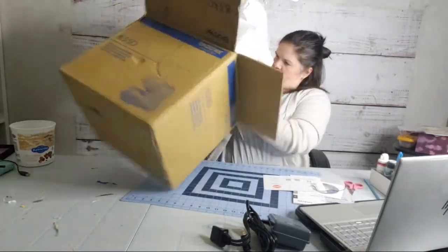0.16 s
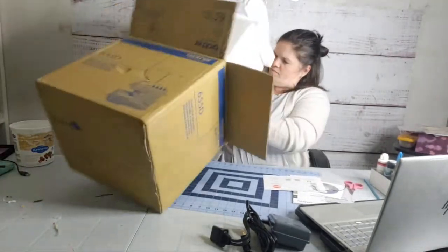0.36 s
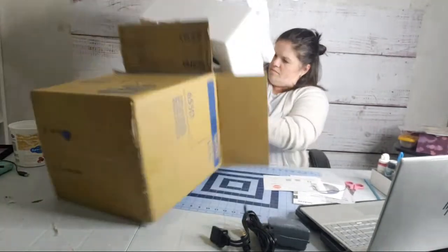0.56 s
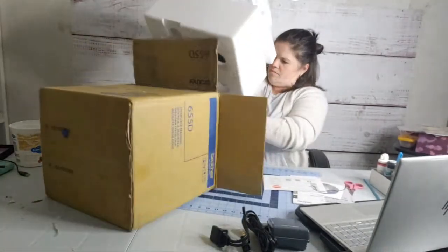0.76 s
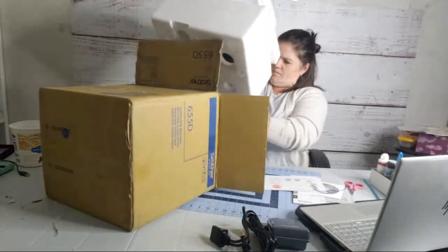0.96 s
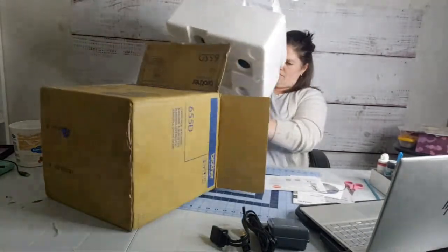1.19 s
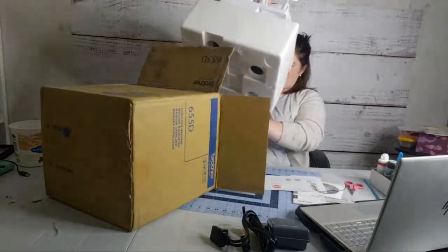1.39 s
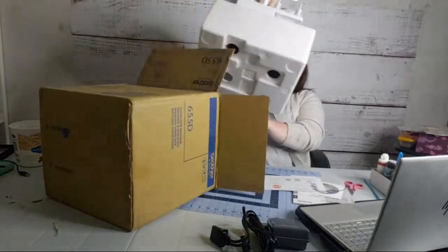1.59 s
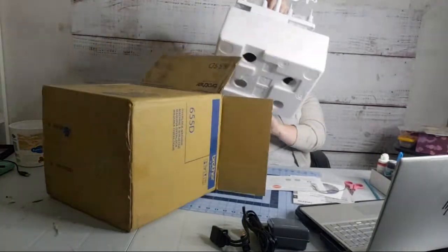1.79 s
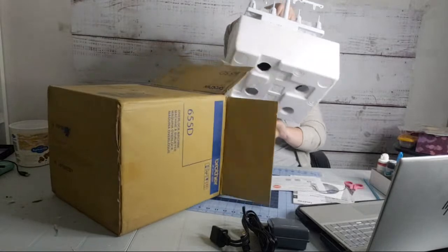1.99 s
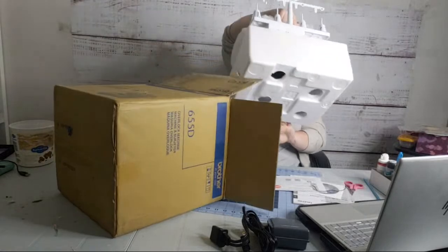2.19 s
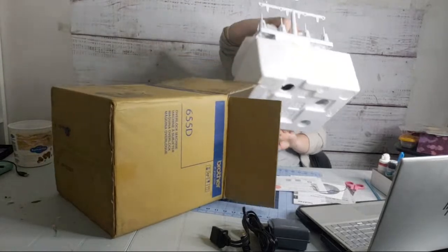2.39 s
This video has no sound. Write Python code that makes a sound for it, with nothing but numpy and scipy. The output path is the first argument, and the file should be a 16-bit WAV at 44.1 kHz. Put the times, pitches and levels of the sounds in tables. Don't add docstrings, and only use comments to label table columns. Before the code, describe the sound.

A cardboard box slaps onto a table amid dry scraping, foam squeaks and small hollow creaks

```python
import sys
import numpy as np
from scipy import signal
from scipy.fft import rfft, irfft
from scipy.io import wavfile
from scipy.ndimage import uniform_filter1d

SR = 44100
rng = np.random.default_rng(int(sys.argv[2]) if len(sys.argv) > 2 else 0)


def linear_from_db(decibels):
    return 10 ** (np.asarray(decibels, float) / 20)


def master(y):
    cut = np.clip(np.atleast_2d(y).T, -1, 1)
    pcm = np.round(cut * 32767)
    wavfile.write(sys.argv[1], SR, pcm.astype(np.int16))


N = 108045
BURST = 8192

# frequency in Hz, level in dB, 60 dB decay time in seconds.
BOX_MODES = [(71.3, 2, 0.11), (99, -4, 0.14), (120, -3.5, 0.11), (144.6, -2, 0.48), (218, -4.5, 0.062),
             (284.8, 5, 0.18), (353, 1, 0.11), (376.3, -14, 0.099), (465, -4, 0.31), (562.3, 8, 0.22),
             (653, -29, 0.25), (846, 5, 0.14), (1113, -23, 0.36), (1270, -30.5, 0.1)]


def unit(x):
    return x / np.sqrt(np.mean(x ** 2))


def add(out, s, sound):
    part = out[max(int(s * SR), 0):][:len(sound)]
    part += sound[:len(part)]


def colour(x, points):
    p = np.array(points, float)
    hz = np.arange(N // 2 + 1) * SR / N + 1
    gain_db = np.interp(np.log(hz), np.log(p[:, 0]), p[:, 1])
    return unit(irfft(rfft(x) * linear_from_db(gain_db), N))


def walk(rate):
    k = int(SR / rate)
    held = rng.standard_normal(size=256)[np.arange(N) // k]
    return unit(uniform_filter1d(uniform_filter1d(held, k), k))


def ring(x, hz, t60):
    r = np.exp(-np.log(1000) / (t60 * SR))
    return signal.lfilter([1 - r, 0, r - 1], [1, -2 * r * np.cos(2 * np.pi * hz / SR), r * r], x)


def bumps(contacts, modes):
    swell = 0.35
    relative_width = 0.67
    dry_db, body_db = 3.5, 2.5
    push, t = np.zeros(N), np.arange(BURST) / SR
    for s, db, hz, contact in contacts:
        shape = (1 - np.exp(-t / (swell * contact))) * np.exp(-(t / contact) ** 2)
        t60 = np.log(1000) / (np.pi * hz * relative_width)
        rough = rng.standard_normal(BURST) * shape
        burst = ring(ring(rough, hz, t60), hz, t60 / 2)
        same_energy = np.sqrt(np.sum(shape ** 2) / np.sum(burst ** 2))
        add(push, s, burst * linear_from_db(db) * same_energy)
    body = np.zeros(N)
    for k, (hz, db, t60) in enumerate(modes):
        body += (-1) ** k * linear_from_db(db) * ring(push, hz, t60)
    return linear_from_db(dry_db) * push + linear_from_db(body_db) * body


def box_bumps():
    # start in seconds, level in dB, centre in Hz, contact time in seconds.
    bump_contacts = [(.001, -34.5, 260, 0.028), (.05, -41.5, 140, 0.075), (.165, -44.5, 150, 0.04),
                     (.245, -41.5, 197, 0.035), (.35, -47.5, 215, 0.077), (.424, -36, 325, 0.032),
                     (.436, -25.5, 107, 0.02), (.466, -28.5, 120, 0.026), (.515, -38.5, 197, 0.058),
                     (.555, -36, 97, 0.056), (.598, -21.5, 726, 0.0081), (.6025, -16, 343, 0.016),
                     (.606, -17, 115, 0.018), (.627, -18.5, 398, 0.024), (.635, -22, 141, 0.022),
                     (.655, -33, 66.7, 0.063), (.692, -26, 554, 0.031), (.698, -30, 139, .045),
                     (.733, -33.5, 330, 0.037), (.782, -30, 290, 0.016), (.78, -33, 83.4, 0.029),
                     (.875, -52, 141, 0.019), (.955, -50.5, 94, 0.018), (1.325, -53.5, 110, 0.025),
                     (1.641, -44, 120, 0.033), (1.685, -52, 144, 0.026), (1.705, -49, 91, 0.041),
                     (1.785, -46.5, 407, 0.026), (1.81, -52, 93, 0.053), (2.412, -50, 182, 0.016)]
    return bumps(bump_contacts, BOX_MODES)


def more_box_knocks():
    # start in seconds, level in dB, centre in Hz, contact time in seconds.
    more_contacts = [(.001, -41.5, 87, 0.02), (.075, -49.5, 70, 0.027), (.235, -46, 67, .04),
                     (.27, -49.5, 104, 0.043), (.375, -50, 60, .03), (.44, -42, 60, 0.044),
                     (.54, -39, 60, 0.026), (.597, -24.5, 840, 0.0051), (.69, -39, 1340, 0.024),
                     (.695, -47, 2240, .03), (.735, -38, 1390, 0.015), (.79, -44, 710, 0.024),
                     (.875, -49.5, 70, 0.035), (.965, -55, 67, .02), (1.125, -58.5, 80.5, 0.036),
                     (1.24, -68, 200, 0.036), (1.3, -53, 161, 0.045), (1.343, -46.5, 228, 0.0051),
                     (1.642, -46, 65, 0.02), (1.65, -55.5, 258, 0.031), (.608, -36.5, 1820, 0.033),
                     (1.68, -50, 65, .05), (1.87, -60, 70, 0.039), (2.07, -46, 1500, 0.011),
                     (2.19, -48.5, 1510, 0.049), (2.27, -44, 627, .02), (2.265, -54, 880, .02),
                     (2.3, -47, 750, 0.02), (2.345, -57, 308, 0.017), (2.42, -58, 110, .03),
                     (.65, -31, 77, 0.055), (.601, -29, 4550, 0.017)]
    return bumps(more_contacts, BOX_MODES)


def strokes(moves):
    t = np.arange(N) / SR
    power = np.zeros(N)
    for s, db, rise, fall in moves:
        distance = np.where(t < s, (s - t) / rise, (t - s) / fall)
        power += linear_from_db(db - 20 * distance ** 2) ** 2
    return np.sqrt(power)


def rubbing(moves, points):
    grain_db, flicker_db, drag_db = 2.5, 1.2, 0.5
    grain_size = np.minimum(rng.exponential(size=N), 5)
    grains = rng.standard_normal(N) * linear_from_db(grain_db * grain_size)
    body = colour(grains, points)
    low = signal.sosfilt(signal.butter(2, 5000, fs=SR, output="sos"), body)
    high = body - low
    mixed = low * linear_from_db(flicker_db * walk(29.38)) + high * linear_from_db(flicker_db * walk(30.17))
    return unit(mixed * linear_from_db(drag_db * walk(12.3))) * strokes(moves)


def card_slides():
    # peak in seconds, level in dB, rise in seconds, fall in seconds (both over 20 dB).
    card_moves = [(.038, -43, 0.47, 0.12), (.212, -38.5, 0.17, 0.34), (.414, -37.5, 0.021, 0.15),
                  (.542, -42.5, .14, 0.1), (.607, -28.5, 0.021, 0.079), (.706, -38, 0.14, 0.045),
                  (.797, -45, 0.12, 0.064), (.902, -53, 0.12, 0.15), (1.302, -50.5, 0.51, 0.35),
                  (1.518, -46, 0.41, 0.15), (1.595, -53, 0.061, 0.035), (1.67, -62, 0.066, 0.034),
                  (1.772, -44.5, 0.0095, 0.16), (1.835, -46.5, 0.096, 0.049), (2.062, -48, 0.3, 0.31),
                  (2.202, -50, 0.032, 0.12), (2.328, -54, 0.13, 0.09), (2.427, -53, 0.015, .14)]
    # frequency in Hz, density in dB per Hz.
    card_tone = [(55, -24), (250, -2.5), (700, 3), (1800, 1), (3000, -1), (5000, -3), (7000, -9),
                 (11000, -12.5)]
    return rubbing(card_moves, card_tone)


def foam_strokes():
    # peak in seconds, level in dB, rise in seconds, fall in seconds (both over 20 dB).
    foam_moves = [(.049, -38, 0.1, 0.065), (.221, -33, 0.15, 0.32), (.408, -30, 0.094, 0.15),
                  (.548, -34, 0.1, 0.067), (.6025, -32.5, .005, 0.083), (.712, -38.5, 0.11, 0.19),
                  (.795, -41, 0.11, 0.026), (.893, -47, 0.023, 0.13), (1.268, -42.5, 0.26, 0.24),
                  (1.488, -34.5, 0.09, 0.17), (1.575, -36.5, 0.25, 0.096), (1.672, -41, 0.025, 0.063),
                  (1.762, -36.5, 0.015, 0.16), (1.828, -35, 0.12, 0.044), (1.952, -46.5, 0.052, 0.26),
                  (2.078, -42.5, 0.013, 0.091), (2.198, -46.5, .065, 0.11), (2.322, -37, 0.087, 0.062),
                  (2.422, -37, 0.066, 0.13)]
    # frequency in Hz, density in dB per Hz.
    foam_tone = [(1000, -13.5), (4000, -5.5), (6000, -2.5), (8500, -6), (10000, -5.5), (11500, 2.5),
                 (13000, 3.5), (15800, 2)]
    return rubbing(foam_moves, foam_tone)


def squeals():
    # start in seconds, length in seconds, level in dB, start pitch in Hz, end pitch in Hz.
    squeal_notes = [(.16, .25, -49, 215, 205), (1.09, .2, -65, 1430, 1400), (1.14, .14, -59, 720, 700),
                    (1.2, .08, -58, 950, 1080), (1.34, .09, -59, 560, 680), (1.415, .1, -61, 1830, 1800),
                    (1.49, .12, -60, 1700, 1620), (1.48, .1, -55, 6100, 5800), (1.5, .08, -61, 3000, 2800),
                    (1.8, .05, -58, 3350, 3450), (1.815, .04, -56, 5300, 5300)]
    relative_width = 0.04
    out = np.zeros(N)
    for s, length, db, start_hz, end_hz in squeal_notes:
        t = np.arange(min(int(length * SR), 2 * BURST)) / SR
        phase = 2 * np.pi * (start_hz * t + (end_hz - start_hz) * t ** 2 / (2 * length))
        noise = rng.standard_normal(size=(2, 2 * BURST))
        smooth = signal.lfilter(*signal.butter(2, relative_width * start_hz, fs=SR), noise)
        a, b = smooth[:, -len(t):]
        note = unit(a * np.sin(phase) + b * np.cos(phase))
        add(out, s, linear_from_db(db) * note * np.sin(np.pi * t / length) ** .5)
    return out


def shell_creaks():
    # start in seconds, level in dB, centre in Hz, contact time in seconds.
    creak_contacts = [(.197, -34, 565, 0.048), (.255, -44, 517, 0.07), (1.872, -47.5, 333, 0.033),
                      (1.953, -45, 526, 0.023), (1.982, -46.5, 346, 0.057), (2.022, -49.5, 290, 0.068),
                      (2.088, -47, 415, 0.028), (2.16, -39.5, 423, 0.025), (2.184, -35.5, 388, 0.034),
                      (2.242, -37, 440, 0.021), (2.27, -38, 343, 0.02), (2.298, -46, 320, 0.017),
                      (2.348, -60, 318, 0.032), (2.181, -42.5, 820, 0.03)]
    # frequency in Hz, level in dB, 60 dB decay time in seconds.
    shell_modes = [(215, 13, 0.12), (316, 7.5, 0.42), (384, -19, 0.062), (470, 9, 0.11), (565, -8.5, .06),
                   (668, 7, 0.25), (851, 2, 0.18), (1037, -13, 0.047), (1125, -23, 0.14)]
    return bumps(creak_contacts, shell_modes)


def cracks():
    # start in seconds, level in dB, ring in Hz, 60 dB decay time in seconds.
    crack_rings = [(0.5985, -21, 1010, 0.0065), (0.6012, -8.5, 2863, 0.017), (0.6006, -13, 4410, 0.012),
                   (0.6007, -9, 5700, 0.0038), (0.6035, -14, 4670, 0.008), (0.6066, -19, 4790, 0.015),
                   (.6095, -17, 2240, 0.011), (0.6165, -23, 4400, 0.0074), (0.641, -29, 1600, 0.02),
                   (0.7025, -19.5, 1580, 0.02), (0.713, -29, 2260, 0.02), (1.7484, -30, 13400, 0.02),
                   (2.0738, -27, 14200, 0.01), (.6068, -18, 2630, 0.019), (.62, -41, 2820, .02),
                   (.601, -23, 12500, .012)]
    snap_s, grit_gain = 0.00035, 0.12
    out, t = np.zeros(N), np.arange(BURST) / SR
    for s, db, hz, t60 in crack_rings:
        grit = ring(rng.standard_normal(BURST), hz, t60 / 8) * 10
        tone = np.sin(2 * np.pi * hz * t) + grit_gain * grit
        onset = (1 - np.exp(-t / snap_s)) ** 2
        add(out, s, linear_from_db(db - 60 * t / t60) * onset * tone)
    return out


def room_tail():
    low_t60_s, treble_t60_s, split_hz = 0.41, 0.089, 2000
    t = np.arange(SR // 2) / SR
    noise = rng.standard_normal(SR // 2) * np.clip(t / 0.0038 - .5, 0, 1)
    low = signal.lfilter(*signal.butter(1, split_hz, fs=SR), noise)
    tail = low * linear_from_db(-60 * t / low_t60_s) + (noise - low) * linear_from_db(-60 * t / treble_t60_s)
    return tail / np.sqrt(np.sum(tail ** 2))


def room_noise():
    # frequency in Hz, density in dB per Hz.
    hush_tone = [(30, -41), (60, -11.5), (130, -10), (290, -19), (650, -15), (1100, -26), (8000, -56),
                 (15700, -41)]
    level_db = -58 + 0.47 * walk(4.3)
    return colour(rng.standard_normal(N), hush_tone) * linear_from_db(level_db)


def side_puffs(mid):
    # start in seconds, low edge in Hz, high edge in Hz.
    puff_bands = [
        (.207, 4100, 6400),
        (.207, 14300, 15800),
        (.3, 8200, 9800),
        (1.115, 13000, 14600),
        (1.162, 4600, 5800),
        (1.162, 7500, 9000),
        (1.2, 10400, 12100),
        (1.2, 5500, 6900),
        (1.24, 8200, 9900),
        (1.5, 11900, 13600),
    ]
    frame = 2048
    side, hz = np.zeros(N), np.arange(frame // 2 + 1) * SR / frame
    for s, low_hz, high_hz in puff_bands:
        band = (hz > low_hz) & (hz < high_hz)
        level = np.std(irfft(rfft(mid[int(s * SR):][:frame]) * band))
        puff = unit(irfft(rfft(rng.standard_normal(frame)) * band))
        add(side, s, puff * level * linear_from_db(-3.5) * np.hanning(frame))
    return side


def scene():
    dry = box_bumps() + more_box_knocks() + card_slides() + foam_strokes()
    dry = dry + squeals() + shell_creaks() + cracks()
    reverb = linear_from_db(-14) * signal.fftconvolve(dry, room_tail())[:N]
    mono = dry + reverb + room_noise()
    return np.array([mono, mono])


def band_limit(x):
    return signal.sosfilt(signal.butter(12, 17020, fs=SR, output="sos"), x)


def record(dry):
    x = signal.sosfilt(signal.butter(3, 39.4, "high", fs=SR, output="sos"), dry)
    x = signal.sosfilt(signal.ellip(10, .2, 70, 15820, fs=SR, output="sos"), x)
    x = x + side_puffs(x[0]) * np.array([[1], [-1]])
    return band_limit(x)


dry = scene()
out = record(dry)
master(out)
```